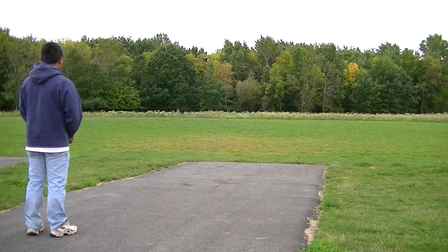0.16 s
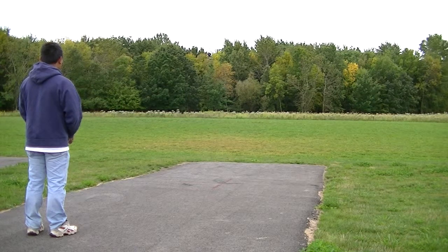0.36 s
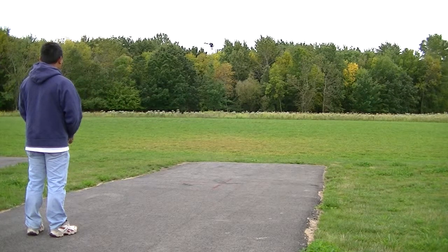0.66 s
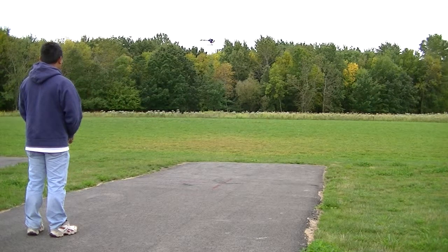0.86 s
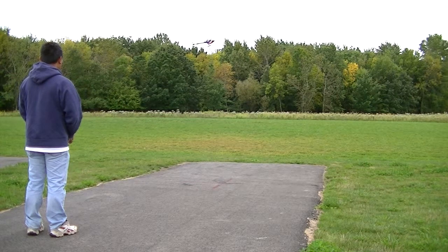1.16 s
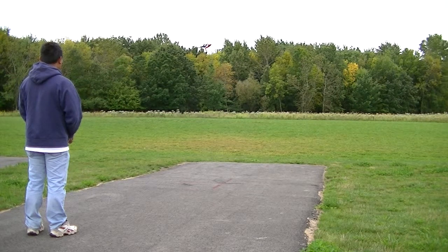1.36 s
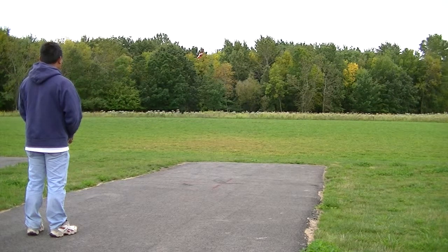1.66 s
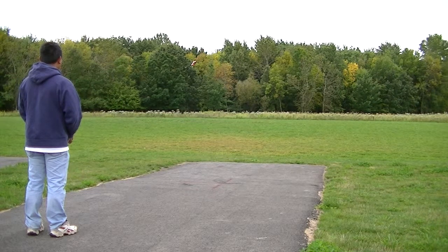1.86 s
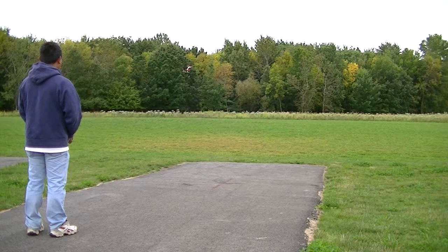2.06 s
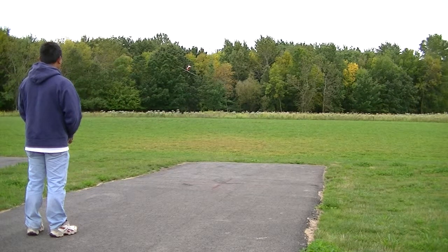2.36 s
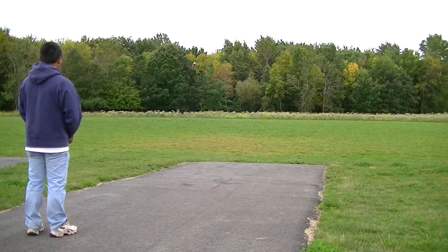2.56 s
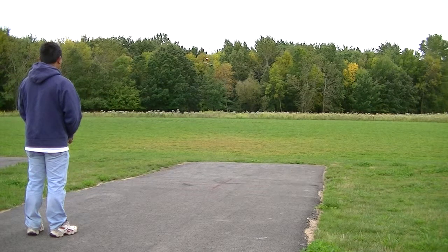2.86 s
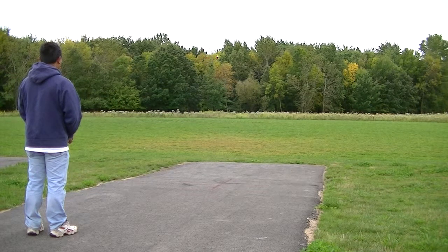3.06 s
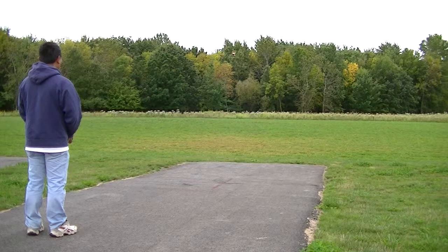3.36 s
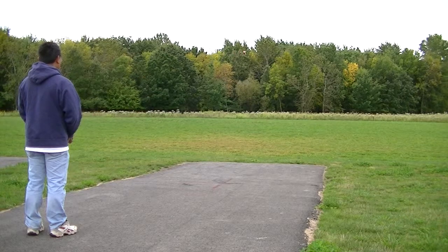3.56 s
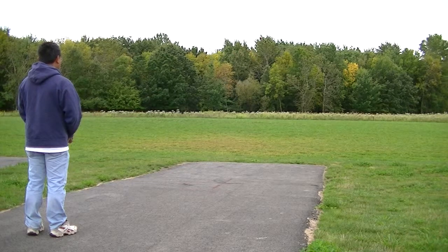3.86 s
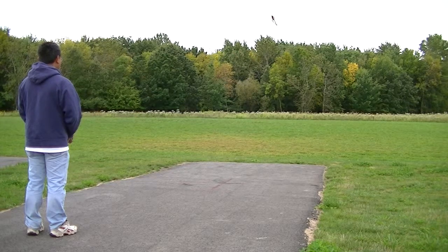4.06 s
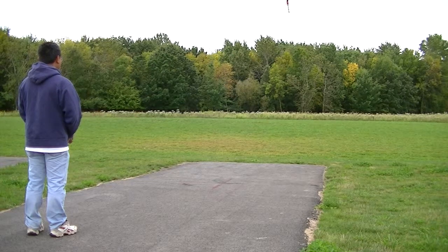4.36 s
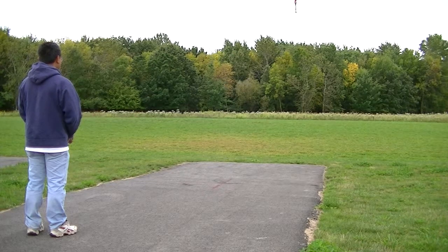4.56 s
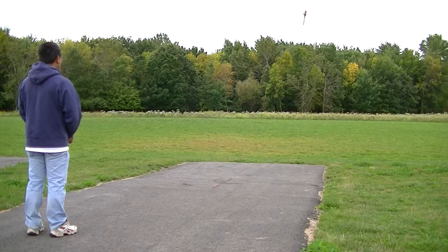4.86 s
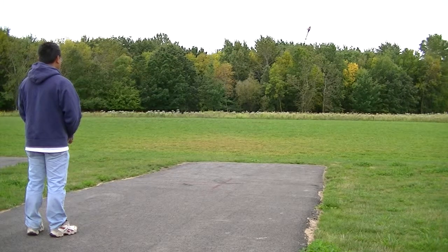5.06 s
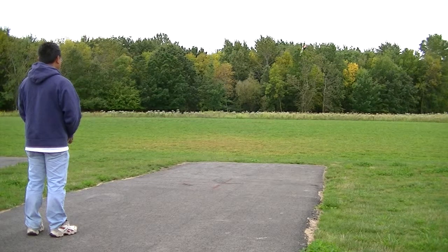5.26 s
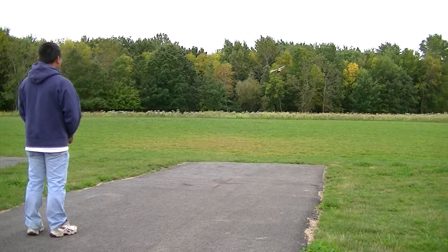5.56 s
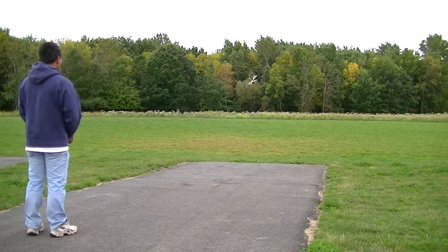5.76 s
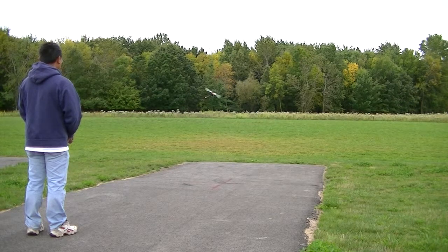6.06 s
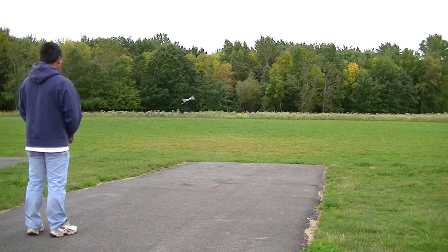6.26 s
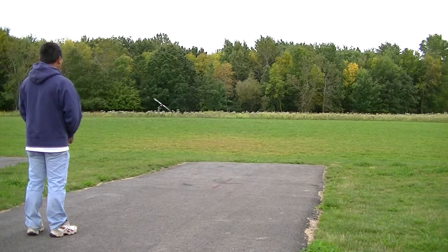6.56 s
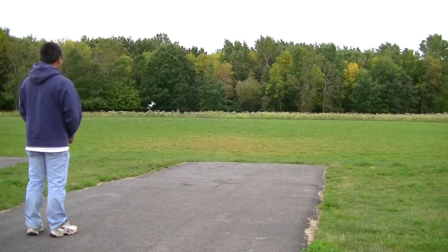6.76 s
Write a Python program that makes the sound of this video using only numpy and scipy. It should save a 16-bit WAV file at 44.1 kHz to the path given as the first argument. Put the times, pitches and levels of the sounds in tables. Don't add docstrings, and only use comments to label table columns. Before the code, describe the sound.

An electric model helicopter tumbles over an open field, rotor swish loud then receding, slapping in bursts, with a thin motor whine that dips and recovers.

```python
import sys
import numpy as np
from scipy import signal
from scipy.io import wavfile
from scipy.ndimage import uniform_filter1d, map_coordinates

SR = 44100
rng = np.random.default_rng(int(sys.argv[2]) if len(sys.argv) > 2 else 0)


def int16_out(signal):
    q = np.round(np.clip(np.atleast_2d(signal).T, -1, 1) * 32767)
    wavfile.write(sys.argv[1], SR, q.astype(np.int16))


def attenuation_scalar(level_db):
    decades = np.asarray(level_db, float) / 20
    return 10 ** decades


N = 304731
T_S = np.arange(N) / SR

# time_s, shaft_hz
MOTOR = [(0, 261.5), (.2, 257.5), (.46, 257), (.65, 259.3), (1.05, 261.9), (1.75, 258.5), (2.15, 254.3),
         (2.55, 254.5), (3, 256.5), (3.72, 257.6), (4.01, 244.3), (4.27, 258.5), (4.4, 260.8),
         (4.95, 259.9), (5.25, 261), (5.65, 258.2), (6.05, 263.7), (6.91, 267.2)]
# time_s, slap_share_0_1, lead_passes, pitch_hz, crispness_db
SLAP = [(0, .11, .05, 2100, -2), (1.12, .06, -.1, 2090, -4), (1.27, .34, -.1, 2060, -6),
        (1.72, .14, -.35, 2050, 0), (1.87, .27, -.45, 2150, -4), (2.07, .42, -.32, 2200, 0),
        (2.12, .56, -.28, 1320, 0), (2.45, .48, -.28, 1290, -2), (2.85, .17, -.28, 1260, -4),
        (4.02, .08, -.45, 1580, -4), (4.25, .52, -.4, 1710, -5), (4.55, .26, -.46, 2000, -4),
        (4.77, .38, -.4, 1900, -5), (5.15, .06, -.6, 2050, -3), (5.7, .05, -.3, 2000, 0),
        (6.02, .27, -.17, 1900, 6), (6.32, .46, -.32, 2300, 6), (6.35, .06, -.32, 2440, 0)]
# time_s, level_db, bite (deepens), disc_edge_to_mic (sharpens)
SWISH = [(0, -22.5, -1.2, -0.2), (.15, -31, 0.13, 0.26), (.8, -31, -0.2, .2), (1.15, -23.5, -0.43, 0.43),
         (1.27, -21, 0.46, 0.33), (1.99, -22, -0.14, -0.14), (2.12, -27.5, -0.14, 0.078),
         (2.65, -35, 0.17, -0.12), (3.93, -35.5, -.1, 0.28), (4.1, -29, 0.064, 0.12),
         (4.33, -31, 0.48, 0.2), (4.5, -28, -.2, -0.11), (4.78, -29.5, 0.24, 0.033),
         (4.92, -27, 0.4, -0.39), (5.68, -30, -0.72, 0.14), (6.31, -28, -0.15, 0.032),
         (6.36, -34, -0.074, -0.11), (6.91, -33, -0.43, -0.77)]
# freq_hz, density_db_per_hz
SWISH_COLOUR = [(250, -28), (450, -4.5), (700, -6.5), (1400, -1.5), (2400, -3), (4000, -5), (7500, -8),
                (9000, -16), (10500, -27), (13000, -30.5), (15700, -34)]
# time_s, distance_m
RANGE = [(0, 24), (1.6, 20), (1.75, 27), (3, 35), (4.3, 32), (5.5, 36), (6.1, 33), (6.91, 32)]
# middle_s, length_s, level_db
PINION = [(.08, .25, -42), (0.83, 0.64, -33.5), (1.513, 0.46, -30.5), (2.55, 0.92, -42),
          (4.092, .12, -32.5), (4.2, .16, -41), (4.493, 0.43, -39), (5.3, 0.71, -41.5), (5.637, 0.21, -34),
          (6.1, 0.5, -44), (6.45, .3, -47), (6.78, 0.54, -34.5)]
POLES = [(.62, 0.26, -38), (1, 0.28, -40), (1.25, 0.19, -34), (1.62, .14, -36), (2.45, 0.44, -40.5),
         (3.2, 1.0, -45.5), (4.0, .1, -37.5), (4.1, .11, -32), (4.4, .13, -38.5), (4.7, 0.41, -45),
         (5.27, 0.14, -42), (5.6, .12, -39.5), (5.9, 0.27, -39.5), (6.55, 0.88, -44)]
SLOTS = [
    (.25, 0.65, -42),
    (1.05, 0.71, -39),
    (2.85, 0.61, -49),
    (5.35, 0.23, -49),
    (6.7, .5, -60),
]
POLES_TWICE = [
    (.22, .55, -48),
    (.75, .25, -46),
    (1.55, 0.27, -51),
    (3.2, 0.94, -46),
    (4.08, .1, -43),
    (4.6, .5, -51),
    (5.2, .3, -66),
    (5.9, .25, -60),
    (6.65, 0.35, -49),
]
HIDDEN_DB = [-51, -53, -60, -60]
# motor_multiple, level_db
FAINT = [(6.78, -56), (8.83, -53), (20, -54.5), (40, -73)]
# time_s, blade_hum_db, overtones_db
TAIL_WORK = [(0, -42.5, -41.5), (.9, -46, -38), (1.12, -52, -43), (1.3, -50, -31), (1.55, -49.5, -39.5),
             (2, -47, -57), (2.6, -44, -44.5), (3, -43.5, -45.5), (3.65, -47.5, -45.5), (4.1, -44.5, -39.5),
             (4.6, -45, -44), (4.9, -51.5, -52), (5.3, -58, -36), (5.7, -50.5, -49), (6.1, -45.5, -41.5),
             (6.4, -43, -56), (6.91, -40, -55)]
# tail_shaft_multiple, relative_db
TAIL_TONES = [(1, -20.5), (3, -12.5), (4, -4), (6, -9.5), (8, -18)]
# middle_s, length_s, low_thump_db, fourth_overtone_db, loaded_thump_db
PULLS = [
    (.3, 0.81, -62, -60, -53.5),
    (.9, 0.36, -61, -64, -53),
    (2.053, 0.72, -57.5, -53.5, -49.5),
    (2.9, 1, -74, -66, -51.5),
    (4.25, 0.4, -63, -76, -43.5),
    (5, 0.79, -58, -71, -44.5),
    (5.954, 0.43, -59, -60, -48),
    (6.24, 0.44, -54.5, -44, -47),
    (6.65, 0.68, -54, -60.5, -75),
]
COASTING_DB = [-66.5, -69.5, -65]
# blade_multiple, relative_db
THUMP_LOW = [(1, -16), (2, 0), (3, -2)]
THUMP_LOADED = [(6, -4.5), (7, -5.5), (8, -3.5), (9, -7), (10, -1), (12, -6.5)]
# time_s, delay_ms, echo_share_0_1
GROUND = [(0, .93, .3), (.3, .96, .45), (.7, 1.105, .7), (.95, 1.155, .65), (1.15, 1.13, .7),
          (1.7, .915, .5), (2.25, .77, .42), (2.5, .81, .6), (3.1, .862, .68), (3.7, .93, .55),
          (3.9, .98, .45), (4.1, 1.155, .62), (4.3, 1.3, .15), (4.8, 1.5, .08), (5.5, .8, .33),
          (5.7, .665, .6), (6.3, .375, .5), (6.91, .39, .7)]
# time_s, delay_ms
HOUSING = [(0, 1.06), (1.1, 1.062), (2.25, 1.092), (3, 1.055), (3.6, 1.005), (4.65, .922), (5.4, .928),
           (5.9, .995), (6.91, 1.145)]
# middle_s, length_s, level_db
GUSTS = [
    (0.993, 0.46, -49),
    (2.087, 0.65, -47),
    (2.856, 0.41, -41),
    (3.9, 0.57, -46),
    (4.5, .4, -65),
    (5.333, 0.47, -44),
]
# freq_hz, density_db_per_hz
BREEZE_COLOUR = [(20, -52), (55, -38), (100, -20), (160, -10.5), (230, 1), (300, -5.5), (350, -37),
                 (520, -49)]
# freq_hz, density_db_per_hz
HISS_COLOUR = [(300, -4), (3000, -9), (9000, 7), (12000, -8), (15700, -13)]

BLADE_PER_TURN, TAIL_PER_TURN = .3014, .7768
INERTIA_S = .06
SQUARENESS = 3.5
BODY_LAG, HISS_LAG, TOP_LAG = 0.63, 0.36, 1
BITE_DB, EDGE_DB, EDGE_TOP_DB = 10.0, 10.0, 3.0
AIR_LOSS_DB_PER_M = .45
BLADE_MISMATCH_DB = .8
GRAZING_MS, STEEP_MS, TURF_HZ = .55, .8, 2900
CALM_DB, HISS_DB = -50, -59


def evened(x):
    return x / np.sqrt(np.mean(x ** 2) + 1e-20)


def curves(rows, t_s=T_S):
    s, *columns = np.transpose(rows)
    return [np.interp(t_s, s, c) for c in columns]


def swells(rest_db, rows):
    middle_s, length_s, *columns = np.transpose(rows)
    coarse_s = T_S[::64]
    shape = np.exp(-abs(2 * (coarse_s[:, None] - middle_s) / length_s) ** SQUARENESS)
    power = [attenuation_scalar(2 * rest) + shape @ attenuation_scalar(2 * db) for rest, db in zip(rest_db, columns)]
    return [np.interp(T_S, coarse_s, 10 * np.log10(p)) for p in power]


def read(points, hz):
    f, value = np.transpose(points)
    return np.interp(np.log(hz + 1), np.log(f + 1), value)


def drift(seconds):
    knots = signal.convolve(rng.standard_normal(9000), signal.windows.hann(7), "same")
    return evened(np.interp(T_S / seconds, np.arange(9000) / 2, knots))


def butter(x, order, hz, kind):
    return signal.sosfilt(signal.butter(order, hz, kind, fs=SR, output="sos"), x)


def butter_in_phase(x, hz, kind):
    return signal.sosfiltfilt(signal.butter(2, hz, kind, fs=SR, output="sos"), x)


def noise(shape_db, size, patchy_db):
    hop = size // 4
    s = np.arange(N // hop + 6) * hop / SR
    hz = np.fft.rfftfreq(size, 1 / SR)[:, None]
    real, imag, patches = rng.standard_normal((len(s), len(hz), 3)).T
    patches = uniform_filter1d(patches, size=9, axis=0)
    patches = evened(uniform_filter1d(patches, size=11, axis=1))
    z = (real + 1j * imag) * attenuation_scalar(shape_db(hz, s) + patchy_db * patches)
    return signal.istft(z, nperseg=size, noverlap=size - hop)[1][:N]


def tone(turns, db, waver_db, smear_turns):
    wobble = smear_turns * drift(0.027) + rng.random()
    level = np.sqrt(2) * attenuation_scalar(db + waver_db * drift(.04))
    return level * np.cos(2 * np.pi * (turns + wobble))


def late(x, delay_ms):
    return map_coordinates(x, [np.arange(N) - delay_ms * SR / 1000], order=3)


def swish_colour(hz, s):
    level_db, bite, edge = curves(SWISH, s)
    body_db = BITE_DB * bite - BODY_LAG * level_db
    hiss_db = EDGE_DB * edge - HISS_LAG * level_db
    top_db = EDGE_TOP_DB * edge - TOP_LAG * level_db - AIR_LOSS_DB_PER_M * curves(RANGE, s)[0]
    body = 1 / (1 + (hz / 1000) ** 4)
    top = 1 / (1 + (10000 / (hz + 1)) ** 12)
    hiss = (1 - top) / (1 + (4200 / (hz + 1)) ** 6)
    tilt_db = sum(part * (db - db.mean())
                  for part, db in ((body, body_db), (hiss, hiss_db), (top, top_db)))
    return read(SWISH_COLOUR, hz) + tilt_db


def wake(hz, s):
    return np.exp(-(np.log2((hz + 1) / curves(SLAP, s)[2]) / .36) ** 2)


def air_colour(hz, s):
    return swish_colour(hz, s) + 11 * curves(SLAP, s)[0] * wake(hz, s)


def slap_colour(hz, s):
    crisp_db = curves(SLAP, s)[3] / (1 + (3500 / (hz + 1)) ** 4)
    soften_db = 5 / (1 + (7000 / (hz + 1)) ** 4)
    return swish_colour(hz, s) + 4 * wake(hz, s) + crisp_db - soften_db


def levelled(x):
    return x / np.sqrt(uniform_filter1d(butter(x, 2, [890, 4300], "band") ** 2, size=7000))


def blades(turns):
    air = levelled(noise(air_colour, size=512, patchy_db=-0.99))
    slap_air = levelled(noise(slap_colour, size=512, patchy_db=1.2))
    share, lead, slap_hz, crisp_db = curves(SLAP)
    share = np.clip(share, 0, .9)

    passes = BLADE_PER_TURN * turns + lead + 0.023 * drift(0.0067)
    index = np.round(passes).astype(int)
    place = passes - index
    chance_db = 1.1 * np.clip(rng.standard_normal(2000), -3, 1.2)
    mismatch_db = BLADE_MISMATCH_DB * (-1) ** np.arange(2000)
    strength = attenuation_scalar(chance_db + mismatch_db)[index + 5]

    burst = evened(strength * (np.exp(-(place / .085) ** 2) + .15 * np.exp(-(place / .2) ** 2)))
    front = strength * np.exp(-(place / 0.013) ** 2)
    crack = evened(butter(front, 2, [1030, 7700], "band"))
    detune = 1 + .1 * rng.standard_normal(2000)[index]
    pass_hz = BLADE_PER_TURN * curves(MOTOR)[0]
    ring = np.cos(2 * np.pi * place * detune * slap_hz / pass_hz)

    flutter = attenuation_scalar(0.33 * drift(.002) + 0.57 * drift(0.055))
    swish = air * evened(flutter)
    slap = burst * (.85 * slap_air + .7 * ring) + .2 * attenuation_scalar(crisp_db) * crack
    torn = np.sqrt(1 - share) * swish + np.sqrt(share) * slap
    return attenuation_scalar(curves(SWISH)[0] + 0.29) * butter(torn, 2, [386, 20000], "band")


def whine(turns):
    tables = (PINION, POLES, SLOTS, POLES_TWICE)
    levels_db = [swells([rest], rows)[0] for rest, rows in zip(HIDDEN_DB, tables)]
    strong = sum(tone(k * turns, db, 1.2, .04) for k, db in zip((10, 14, 27, 28), levels_db))
    return strong + sum(tone(k * turns, db, 2.2, .06) for k, db in FAINT)


def hum(turns):
    tail_db, over_db = curves(TAIL_WORK)
    low_db, fourth_db, loaded_db = swells(COASTING_DB, PULLS)
    tail, blade = TAIL_PER_TURN * turns, BLADE_PER_TURN * turns
    out = tone(2 * tail, tail_db, .9, .03)
    out += sum(tone(k * tail, over_db + db, 2.4, 0.012) for k, db in TAIL_TONES)
    out += sum(tone(k * blade, low_db + db, 1.1, 0.034) for k, db in THUMP_LOW)
    out += tone(4 * blade, fourth_db, 1.5, .03)
    out += sum(tone(k * blade, loaded_db + db, 2.8, 0.016) for k, db in THUMP_LOADED)
    return out


def field(x):
    delay_ms, share = curves(GROUND)
    dull = butter(x, 1, 5500, "low")
    low = butter_in_phase(dull, TURF_HZ, "low")
    swallowed = np.clip((STEEP_MS - delay_ms) / (STEEP_MS - GRAZING_MS), 0, 1)
    shiver_ms = .013 * drift(.006)
    echo = late(dull - swallowed * low, delay_ms + shiver_ms - .026)
    return (x + share * echo) / np.sqrt(1 + share ** 2)


def breeze():
    low = noise(lambda hz, s: read(BREEZE_COLOUR, hz), size=2048, patchy_db=1.5)
    hiss = noise(lambda hz, s: read(HISS_COLOUR, hz), size=512, patchy_db=.6)
    gust_db = swells([CALM_DB], GUSTS)[0] - 5.0
    return attenuation_scalar(gust_db) * evened(low) + attenuation_scalar(HISS_DB) * evened(hiss)


def scene():
    shaft_hz = uniform_filter1d(curves(MOTOR)[0], size=round(INERTIA_S * SR))
    turns = np.cumsum(shaft_hz) / SR
    mix = field(blades(turns)) + whine(turns) + hum(turns) + breeze()
    return np.array([mix, mix])


def band_limit(x):
    return signal.sosfilt(signal.butter(12, 15770, fs=SR, output="sos"), x)


def record(dry):
    short_waves = butter_in_phase(dry[0], [9200, 12600], "band")
    glint = late(short_waves, curves(HOUSING)[0])
    heard = butter(dry + .45 * glint, 2, 40, "high")
    edge = signal.firwin(511, 15750, window=("kaiser", 9), fs=SR)
    mix = signal.oaconvolve(heard, edge[None], "same")
    return band_limit(mix)


dry = scene()
out = record(dry)
int16_out(out)
```